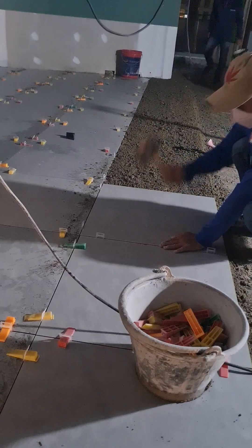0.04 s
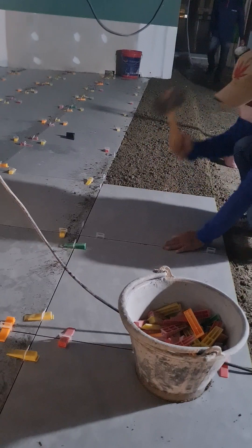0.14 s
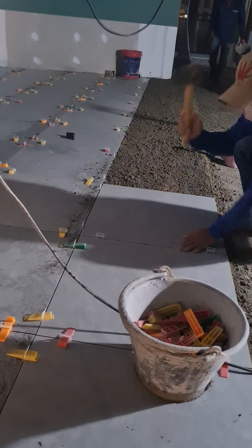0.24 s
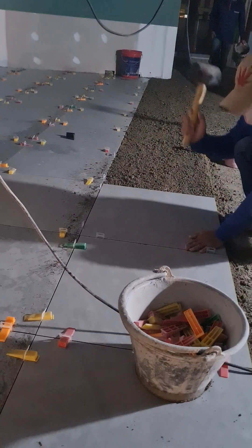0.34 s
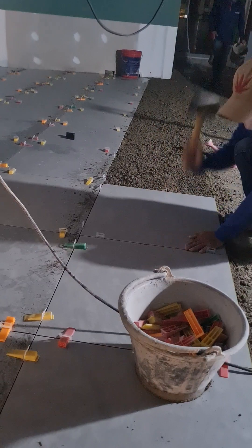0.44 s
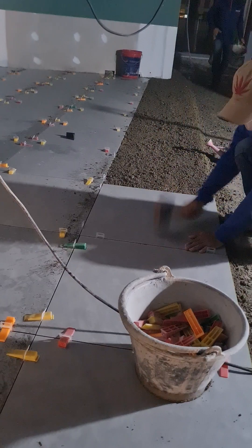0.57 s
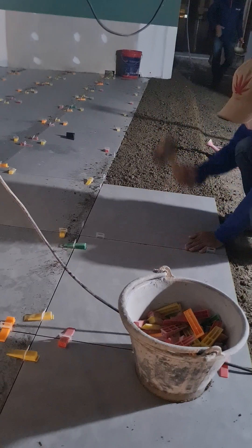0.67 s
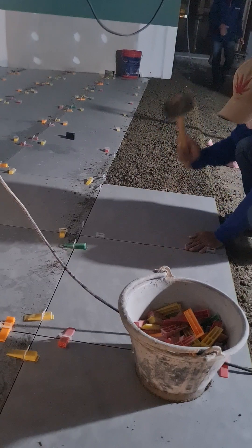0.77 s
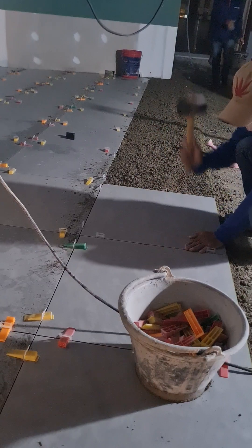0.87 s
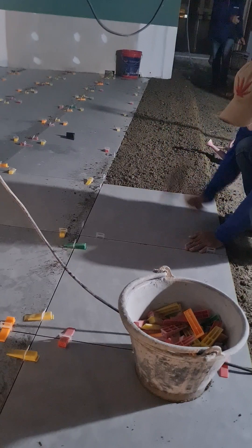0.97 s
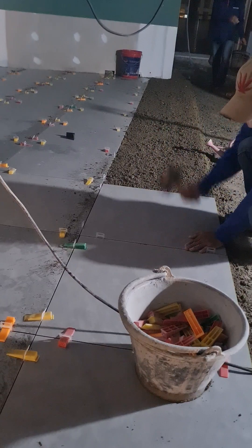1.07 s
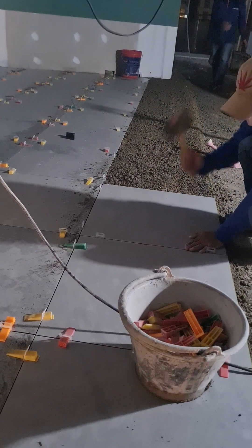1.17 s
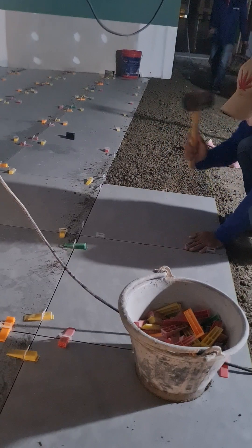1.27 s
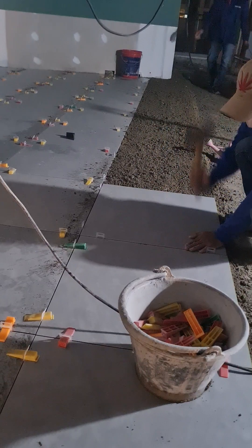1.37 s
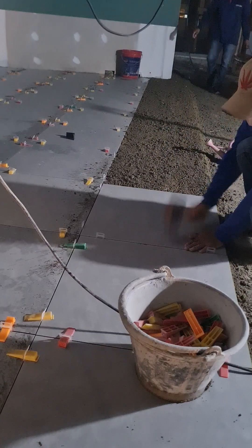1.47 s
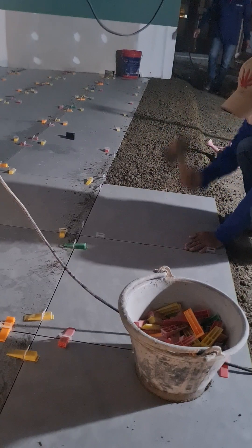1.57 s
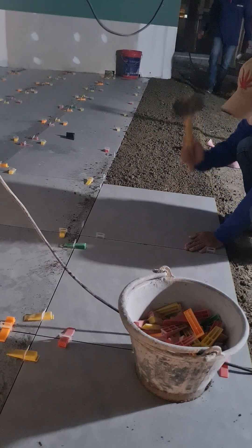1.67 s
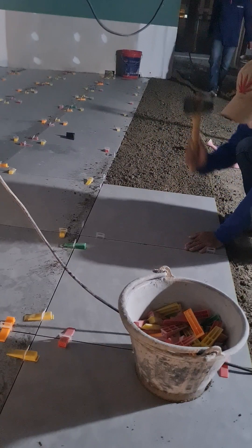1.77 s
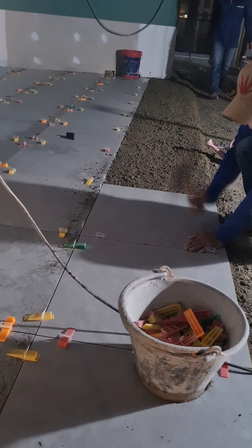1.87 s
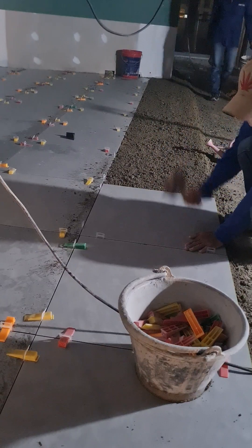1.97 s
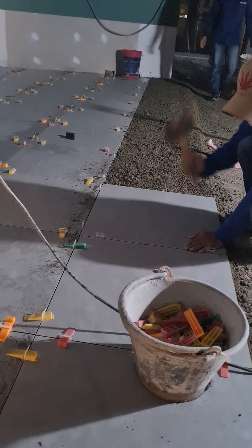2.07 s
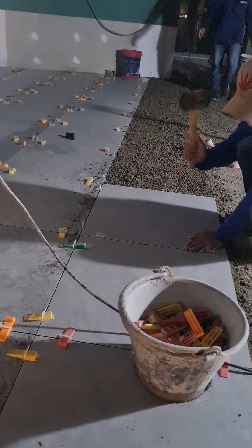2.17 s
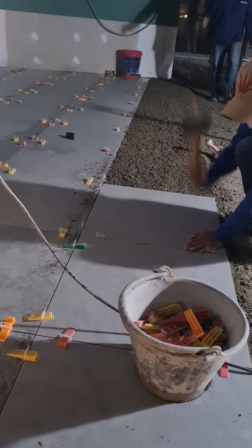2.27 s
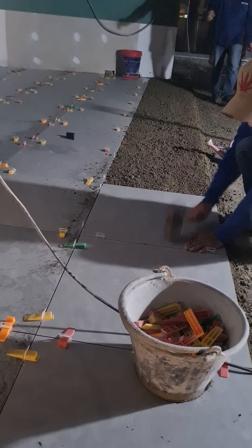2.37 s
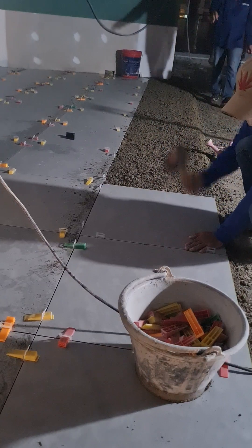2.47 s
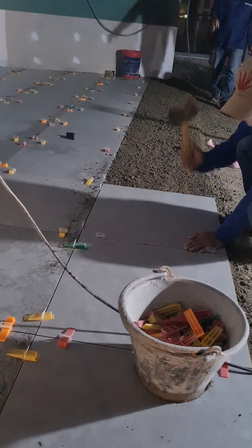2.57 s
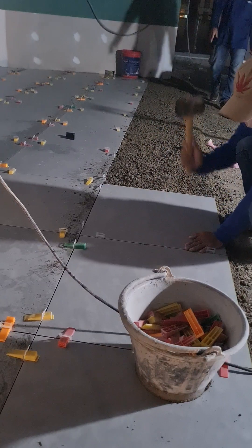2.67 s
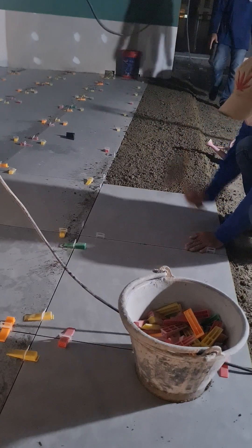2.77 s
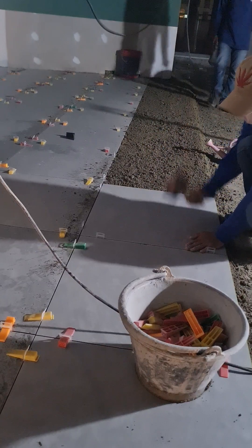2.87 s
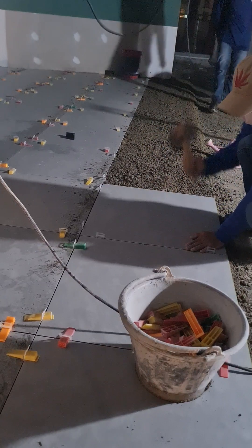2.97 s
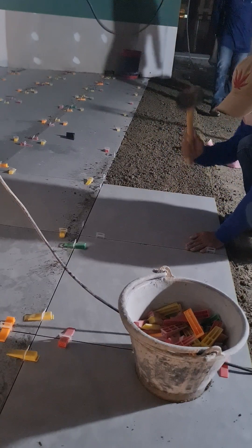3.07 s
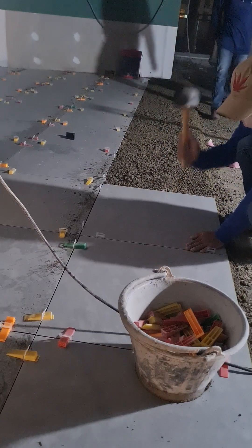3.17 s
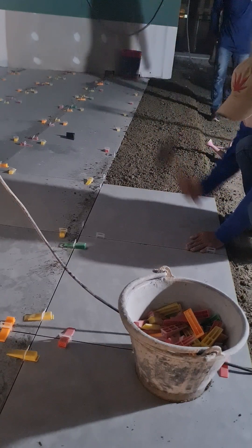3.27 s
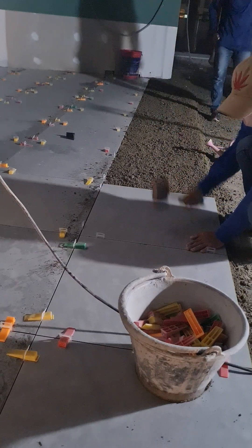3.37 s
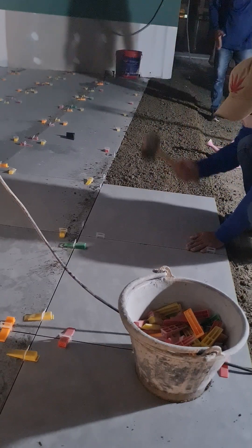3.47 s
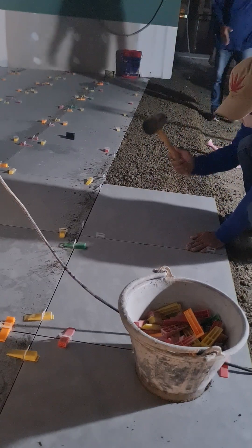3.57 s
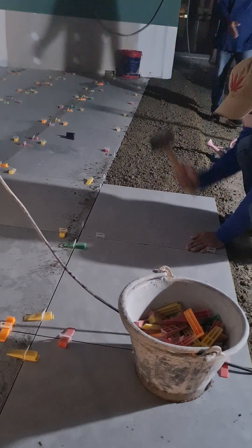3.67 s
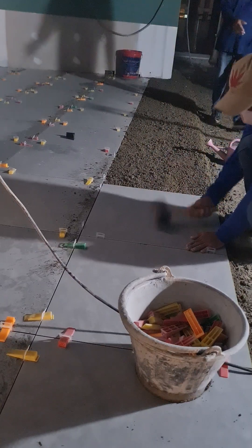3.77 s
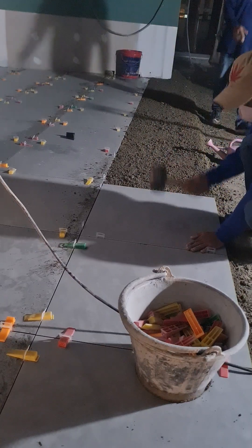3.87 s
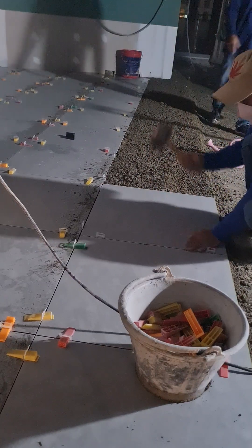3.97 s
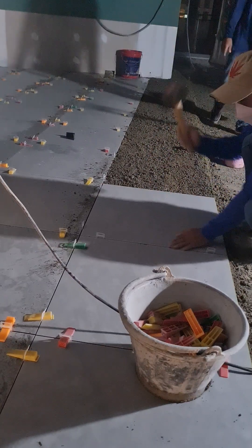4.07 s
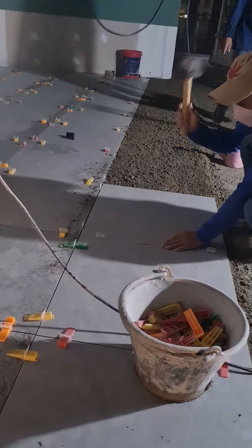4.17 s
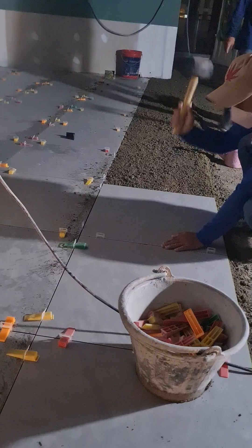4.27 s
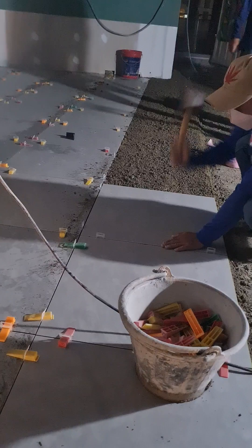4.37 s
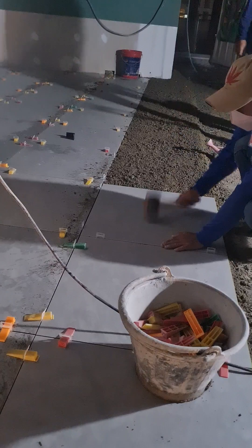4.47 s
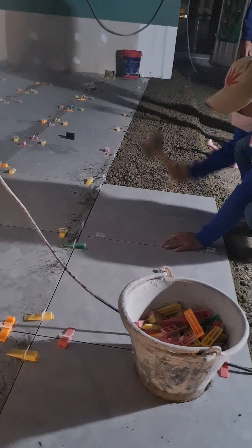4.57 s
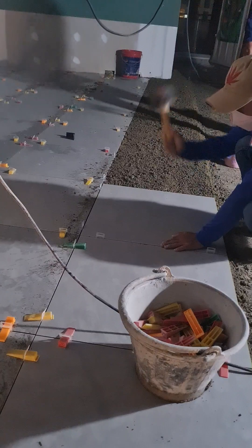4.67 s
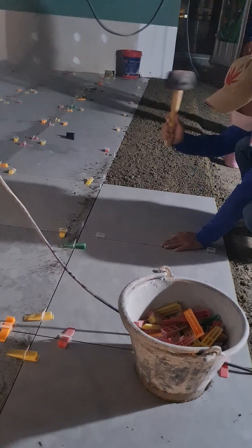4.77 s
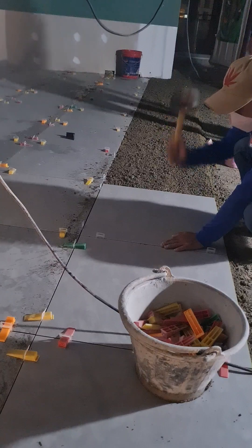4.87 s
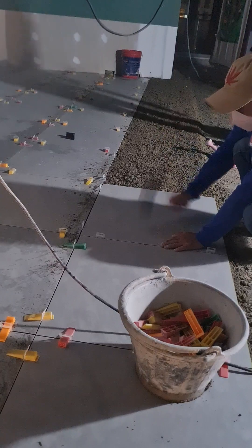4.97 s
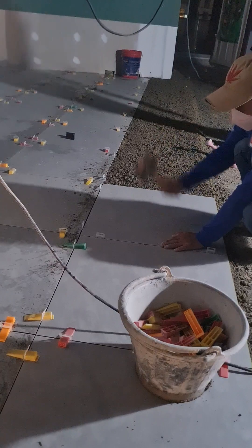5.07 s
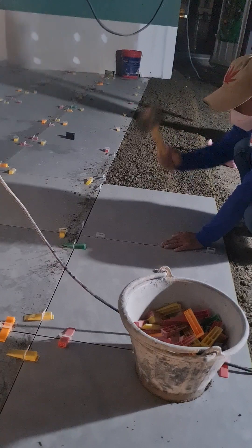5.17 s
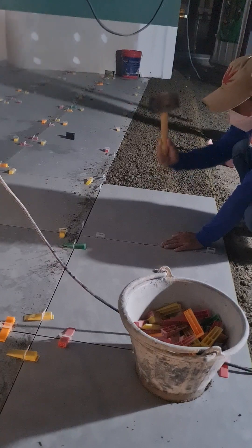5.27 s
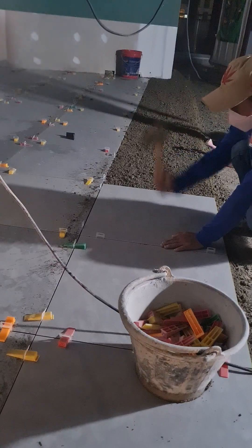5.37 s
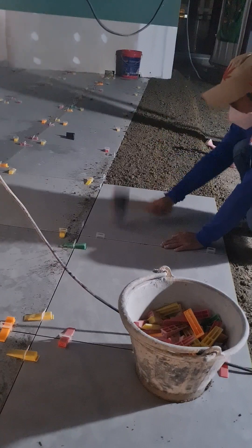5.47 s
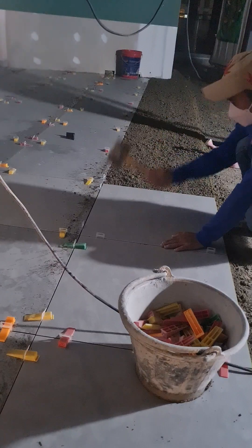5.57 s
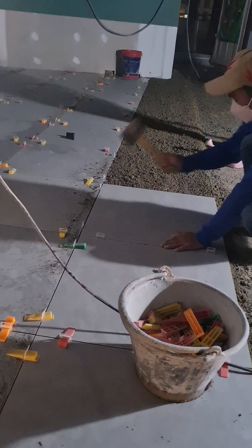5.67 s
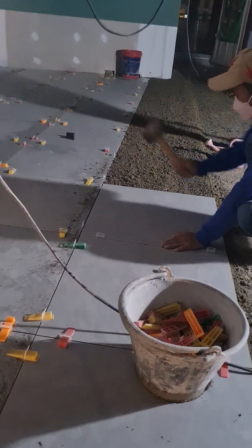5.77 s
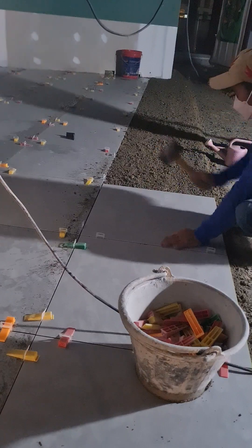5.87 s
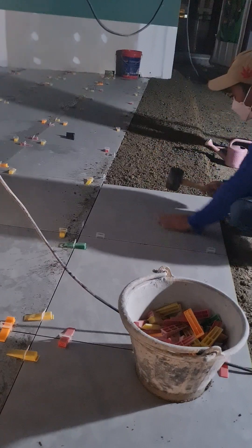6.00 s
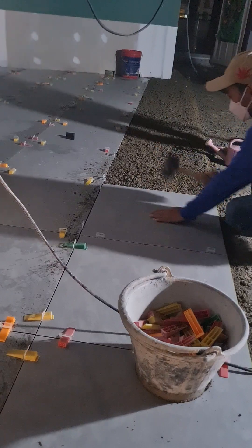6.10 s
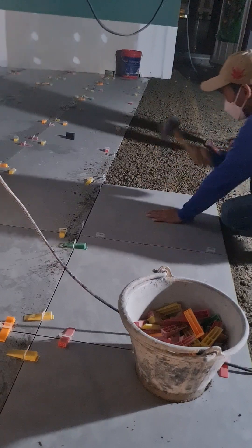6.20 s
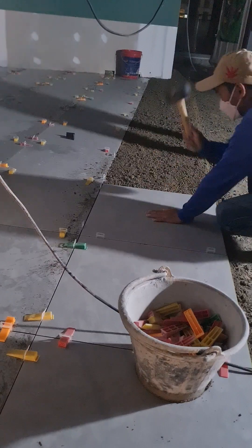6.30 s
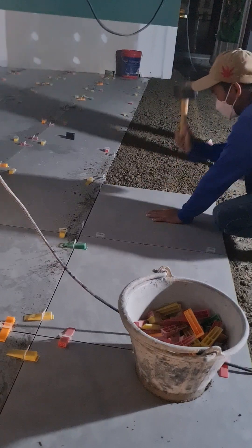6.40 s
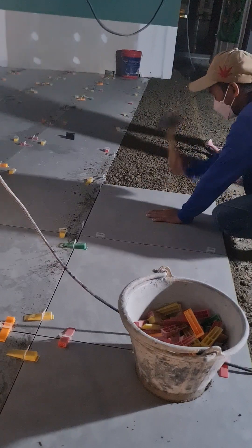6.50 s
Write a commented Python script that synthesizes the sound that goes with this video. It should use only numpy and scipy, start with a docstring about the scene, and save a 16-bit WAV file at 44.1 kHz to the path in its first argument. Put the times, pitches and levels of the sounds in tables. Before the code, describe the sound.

Steady mallet knocks on a heavy tile in an empty, reverberant building site. The first blows slap crisply; midway they turn duller and softer, then after a slightly longer gap the knocks return firm, the last one with a lingering low rattle. Faint grit scuffing, small ticks and quiet low rumble fill the gaps. Wide stereo, near and slightly overloaded on the blows.

```python
"""Bare, echoing hall: a rubber mallet beats a large floor tile into its mortar bed.
Each blow is a soft push that rings the bedded tile plus a short slap of rubber on glaze, made of shaped noise.
The hall answers with wall echoes, booming low modes and a tail of decaying noise.
Loose things tick and rattle; shaken grit, scuffing feet and a low site rumble are filtered noise."""
import sys
import numpy as np
from scipy import signal
from scipy.fft import rfft, irfft
from scipy.io import wavfile
from scipy.ndimage import uniform_filter1d

SR = 44100
rng = np.random.default_rng(int(sys.argv[2]) if len(sys.argv) > 2 else 0)


def amp(db):
    return 10 ** (np.asarray(db, float) / 20)


def write(x):
    x = np.atleast_2d(x).T
    wavfile.write(sys.argv[1], SR, np.round(np.clip(x, -1, 1) * 32767).astype(np.int16))


N = 288414
LEAD = SR // 10  # samples computed ahead of time 0, so that an earlier blow still rings
WINDOW, HOP = 512, 128  # samples, for noise shaped in time and frequency
FRAMES = N // HOP + 5

# push of the mallet head: (time of peak [s], level [dB], contact [ms], wake of tile mode 1 [dB], of mode 2 [dB])
BLOW_PUSHES = [(-.038, -5.5, 3.13, 0.5, 13.5), (.598, -5.5, 2.9, 0.5, 1), (1.0459, -3, 2.98, -0.5, 2),
               (1.4936, -4, 3.15, -1.5, 5), (1.9518, -2.5, 3.15, -3, 3.5), (2.4052, -2.5, 3.28, -4, 6),
               (2.8559, -2.5, 4.02, -6, 12), (3.3696, -3.5, 4.1, -21, -10), (3.8077, -8, 5.94, -4, -9),
               (4.5142, -6, 3.63, 9.5, -2), (5.0365, -4, 4, 2.5, 12), (5.4888, -3, 5.04, -5, -16),
               (5.495, -9.5, 2.9, 1.5, -19)]
# slap of rubber on glaze, one row a blow:
# (level [dB], brightness [dB/octave], share that fills the hall [dB], left over right trim [dB])
BLOW_SLAPS = [(-16.5, 4, 5.5, -13), (-14, 3, 0, -2), (-11.5, 2, -4, 2), (-8, 3, -3, 1.5),
              (-9.5, 1.5, -3, -4), (-11.5, 2, -0.5, -1), (-17, 2, 2, 0), (-24.5, 0, -24, -5),
              (-36, 4, -6, 6), (-12, 0, -3, -0.5), (-15.5, -0.5, -6.5, 5), (-37, 0, -10, 5),
              (-11, 2.5, -1, 0.5)]
# modes of the bedded tile: (frequency [Hz], relative level [dB], t60 [s])
TILE_MODES = [(161.5, -6.5, 0.057), (445, -12, 0.029), (119, -11.5, 0.029), (218, -36, 0.044),
              (307, -24, 0.14), (877, 12, 0.014), (1180, -10, 0.031), (1579, -8, 0.019)]
# slap spectrum: (frequency [Hz], relative density [dB per Hz])
SLAP_SPECTRUM = [(410, -85), (700, -5.5), (2520, -17), (3610, -21.5), (4170, -18.5), (5730, -26),
                 (6630, -20), (7370, -25), (8630, -27.5), (14300, -29), (16500, -49)]
# loose things ticking, knocking, rattling: (time [s], mode level [dB], frequency [Hz], t60 [s], roughness [ratio])
LOOSE_TICKS = [(1.5111, -28.5, 2076, 0.7, 0.8), (1.6103, -23, 2600, .004, 0), (1.6493, -20, 3300, .003, 0),
               (1.98, -38.5, 2060, 0.44, 1.13), (2.732, -36, 1874, 0.12, 0.77),
               (4.363, -38, 420, 0.031, 0.1), (5.496, -19.5, 287, .9, 0.45), (6.101, -36, 436, .04, 0.42),
               (6.525, -34.5, 633, 0.052, .2), (6.526, -37.5, 1350, 0.063, 0.4)]
# nearby things and single walls: (delay [s], thud level [dB], slap level [dB])
WALL_ECHOES = [(.0024, -13, -26), (.0145, -14, -7), (.019, -17, -30), (.0292, -16, -7), (0.043, -17, -33),
               (.059, -18.5, -12)]
# hall tail decay: (frequency [Hz], t60 [s])
HALL_T60 = [(60, 1.58), (160, 0.91), (420, 0.91), (1100, 0.72), (2900, 0.78), (7700, 0.7), (15000, 0.34)]
# hall tail spectrum: (frequency [Hz], relative level [dB])
HALL_SPECTRUM = [(50, -1), (160, 2.5), (420, -3.5), (900, 1.5), (2000, 2.5), (5000, 6.5), (9000, 5),
                 (15000, 7.5)]
# standing hall modes: (frequency [Hz], relative level [dB], t60 [s])
HALL_MODES = [(101.46, -23, 1.93), (135.5, -6.5, 0.49), (162.2, -15.5, 0.73), (221.7, -15, 0.89),
              (342, -11, 0.64), (454, -34, 2.15)]
# likeness of the channels in diffuse sound: (frequency [Hz], correlation [-1 to 1])
CHANNEL_LIKENESS = [(60, 0.96), (180, 0.94), (550, 0.42), (1650, -0.34), (4970, 0.24), (15000, -0.46)]
# left microphone over right: (frequency [Hz], level [dB])
LEFT_OVER_RIGHT = [(60, -1), (180, 1.5), (550, 1.5), (1650, 2.0), (4970, 4.5), (15000, 1)]
# shoes and knees dragged over grit:
# (time of full strength [s], held [s], relative level [dB], brightness [dB/octave])
DRAGS = [(.66, 0.043, -41, -3), (.77, 0.027, -50, -6), (.96, 0.14, -44, 1.5), (1.24, .22, -48, -1.5),
         (1.66, 0.026, -53, 14), (1.81, 0.15, -51, -2), (2.0, 0.051, -43, 6.5), (2.12, 0.023, -46, -5.5),
         (2.73, 0.076, -45, -0.5), (3.14, 0.02, -47.5, 1.2), (3.27, 0.086, -48, -1.5),
         (3.77, 0.097, -48.5, -1), (3.92, 0.058, -44.5, 2.2), (4.2, .03, -51.5, 1),
         (4.33, .04, -47.5, -1.5), (4.72, 0.045, -51, 2), (4.87, 0.21, -47.5, 0.1), (5.7, 0.1, -52.5, -5),
         (5.88, 0.2, -46, 1), (6.1, 0.027, -42, 0.5), (6.52, .05, -51.5, 0.5)]
# grit spectrum: (frequency [Hz], relative density [dB per Hz])
GRIT_SPECTRUM = [(240, -32), (400, 22.5), (432, -7.5), (590, 3.5), (700, -4.5), (986, -1), (1230, 0.5),
                 (1900, 1.5), (15300, -18), (16500, -23)]
# rumble spectrum: (frequency [Hz], relative density [dB per Hz])
RUMBLE_SPECTRUM = [(15, -46), (25, 13), (185, 17), (277, -27), (641, -5.5), (818, -2.5), (4250, -11),
                   (8140, -28), (9840, -115.5), (14800, -41), (16000, -24)]

LATE_PER_MS = 0.33  # the longer the contact, the later the force peaks
DEEP_DB_PER_MS, USUAL_CONTACT_MS = 4, 3.55  # longer contact wakes the third, deepest tile mode more
TOUCH_SHARE = .57  # first touch leads the peak by this share of the contact time
SCUFF_RISE_DB_PER_S, SCUFF_FALL_DB_PER_S = 189, 73
# each slap shakes the grit, which then settles
SHAKE_DB, SHAKE_TILT_DB_PER_OCTAVE, SHAKE_FALL_DB_PER_S = -26.5, -3.3, 36
PATCH_DB, CLUMP_DB = 1.3, 1.5  # rms level swing: over time and frequency, over time alone
RUMBLE_DB = -48.5


def evened(x):
    """Scales to rms 1."""
    return x / np.sqrt(np.mean(x ** 2) + 1e-20)


def read(points, hz):
    """Interpolates a table on a log-frequency axis."""
    f, value = np.transpose(points)
    return np.interp(np.log(hz + 1), np.log(f + 1), value)


def add(mix, time_s, sound):
    """Mixes a sound in at time_s."""
    part = mix[..., LEAD + round(time_s * SR):][..., :sound.shape[-1]]
    part += sound[..., :part.shape[-1]]


def ring(hz, db, t60_s, size=SR // 2, wave=np.sin):
    """One mode: a sinusoid under exponential decay."""
    t = np.arange(size) / SR
    return amp(db - 60 * t / max(t60_s, .002)) * wave(2 * np.pi * hz * t)


def diffuse(level_db, count):
    """Two-channel noise shaped by level_db(hz, t); the bass is alike in both channels."""
    hz = np.fft.rfftfreq(WINDOW, 1 / SR)[:, None]
    t = np.arange(count // HOP + 5) * HOP / SR
    a, b, c, d = rng.standard_normal((len(t), len(hz), 4)).T
    same = np.clip(read(CHANNEL_LIKENESS, hz), -1, 1)
    left = a + 1j * b
    right = same * left + np.sqrt(1 - same ** 2) * (c + 1j * d)
    shaped = np.array([left, right]) * amp(level_db(hz, t))
    return signal.istft(shaped, nperseg=WINDOW, noverlap=WINDOW - HOP)[1][:, :count]


def thud(db, contact_ms, *spot_db):
    """The tile is shoved down and stopped (dip, peak, dip of pressure), then springs back in its modes."""
    late = np.clip(LATE_PER_MS * contact_ms, .75, 2)  # rubber stiffens as it squashes
    u = np.linspace(0, 1, round(contact_ms * SR / 1000)) ** late
    push = np.sin(np.pi * u) ** 4
    speed = np.diff(push, prepend=0)
    acceleration = np.diff(push, 2, prepend=[0, 0])
    deep_db = DEEP_DB_PER_MS * (contact_ms - USUAL_CONTACT_MS)
    wake_db = [*spot_db, deep_db] + [0] * len(TILE_MODES)
    modes = sum(ring(hz, mode_db + wake, t60_s, size=SR // 8, wave=np.cos)
                for (hz, mode_db, t60_s), wake in zip(TILE_MODES, wake_db))
    sound = np.convolve(push / push.sum(), modes)
    sound[:len(push)] += .6 * acceleration / acceleration.min() - .6 * speed / speed.max()
    return amp(db) * sound


def slap(db, tilt_db, hall_db, pan_db, noise):
    """A few ms of hiss plus stiff tile modes; the hall, averaging directions, gets an evenly coloured click."""
    size = noise.shape[1]
    t, hz = np.arange(size) / SR, np.fft.rfftfreq(size, 1 / SR)
    pair = np.array([noise[0], 0.58 * noise[0] + 1.09 * noise[1]])
    pair *= amp([[pan_db / 2], [-pan_db / 2]])
    colour = amp(read(SLAP_SPECTRUM, hz) + tilt_db * np.log2(hz / 3000 + 0.0075))
    burst = (1 - np.exp(-t / .0001)) * np.exp(-(t / .0018) ** 2)
    shape = amp(db) * (burst + amp(-23.5 - 60 * t / 0.28))  # burst over a faint, slower decay
    # only the slap is sharp enough to wake the modes above 1 kHz
    stiff = -sum(ring(f, db + mode_db, t60_s, size=size) for f, mode_db, t60_s in TILE_MODES if f > 1000)
    click = np.roll(irfft(colour), 200)[:400]
    click *= amp(hall_db) * np.linalg.norm(shape) / np.linalg.norm(click)
    click = np.pad(click, (0, size - len(click))) + amp(hall_db) * stiff
    hiss = evened(irfft(rfft(pair) * colour)) * shape
    return hiss + stiff, click


def tick(db, hz, t60_s, rough, noise):
    """A small mode with two brief overtones; loose contact makes it flutter."""
    flutter = evened(uniform_filter1d(noise, size=round(8 * SR / hz)))
    sound = ring(hz, db, t60_s) + ring(1.9 * hz, db - 6, .004) + ring(3.6 * hz, db - 9, .003)
    return sound * (1 - rough + rough * flutter)


def hall(x):
    """Standing low modes and a dense tail that builds up late; the tail changes as the mallet moves on."""
    size = SR * 3 // 2
    build = np.clip((np.arange(size) / SR - .006) / 0.0052, 0, 1)
    booms = sum(ring(hz, db, t60_s, size=size) for hz, db, t60_s in HALL_MODES) / np.sqrt(size)
    out = signal.fftconvolve(x, booms * build)[None]
    place = .45 * np.arange(len(x)) / SR  # radians, turning from one tail to another
    for share in np.cos(place), np.sin(place):
        tail = diffuse(lambda hz, t: read(HALL_SPECTRUM, hz) - 60 * t / read(HALL_T60, hz), count=size)
        tail *= amp(1.0) / np.linalg.norm(tail[0])
        out = out + signal.fftconvolve((share * x)[None], tail * build, axes=1)
    return out[:, :len(x)]


def stirring(t):
    """Level [dB] and brightness [dB/octave] of moving grit at times t: scuffs swell and fade, slaps shake it."""
    full_s, held_s, db, tilt = np.transpose(DRAGS)[:, :, None]
    rise_db = SCUFF_RISE_DB_PER_S * np.maximum(full_s - t, 0)
    fall_db = SCUFF_FALL_DB_PER_S * np.maximum(t - full_s - held_s, 0)
    dragged_db = db - rise_db - fall_db
    hit_s = np.transpose(BLOW_PUSHES)[0, :, None]
    slap_db, slap_tilt, hall_db, _ = np.transpose(BLOW_SLAPS)[:, :, None]
    settling_db = slap_db + hall_db + SHAKE_DB - SHAKE_FALL_DB_PER_S * (t - hit_s)
    shaken_db = np.where(t > hit_s, settling_db, -np.inf)
    power = amp(np.vstack([dragged_db, shaken_db])) ** 2
    tilts = np.vstack([tilt, SHAKE_TILT_DB_PER_OCTAVE + slap_tilt])
    return 10 * np.log10(power.sum(0)), (power * tilts).sum(0) / power.sum(0)


def scuffs():
    """Patchy, clumpy gritty hiss of people moving about and of grit shaken by the blows."""
    patches = rng.standard_normal((FRAMES, WINDOW // 2 + 1)).T
    patches = uniform_filter1d(patches, size=24, axis=0)
    patches = evened(uniform_filter1d(patches, size=10, axis=1))
    clumps = evened(uniform_filter1d(rng.standard_normal(FRAMES), size=3))
    band_hz = np.arange(1500, 9000, SR / WINDOW)
    scale_db = -10 * np.log10(np.sum(amp(read(GRIT_SPECTRUM, band_hz)) ** 2) * 2 / 3)  # evens the band power
    moving_db, tilt = stirring(np.arange(FRAMES) * HOP / SR)
    frame_db = scale_db + PATCH_DB * patches + CLUMP_DB * clumps + moving_db
    return diffuse(lambda hz, t: read(GRIT_SPECTRUM, hz) + frame_db + tilt * np.log2(hz / 3000 + 0.009), count=N)


def rumble():
    """The steady low noise of the site."""
    return amp(RUMBLE_DB) * evened(diffuse(lambda hz, t: read(RUMBLE_SPECTRUM, hz) + 0 * t, count=N))


def scene():
    """Blows and ticks, direct and through the hall, blows also off single walls, over the background."""
    near, sent = np.zeros((2, N + LEAD)), np.zeros(N + LEAD)  # sent feeds the hall
    treble = signal.butter(2, 2800 / (SR / 2), "high")
    slap_noises = rng.standard_normal((len(BLOW_SLAPS), 2, 2048))
    for (peak_s, *push), touch, noise in zip(BLOW_PUSHES, BLOW_SLAPS, slap_noises):
        sound = thud(*push)
        hiss, click = slap(*touch, noise)
        start_s = peak_s - sound.argmax() / SR
        touch_s = peak_s - TOUCH_SHARE * push[1] / 1000
        add(near, start_s, sound)
        add(sent, start_s, sound)
        add(near, touch_s, hiss)
        add(sent, touch_s, click)
        glint = amp(touch[2]) * signal.lfilter(*treble, hiss)  # only the slap's treble comes back sharp
        for delay_s, thud_db, slap_db in WALL_ECHOES:
            add(near, start_s + delay_s, amp(thud_db) * sound)
            add(near, touch_s + delay_s, amp(slap_db) * glint)
    tick_noises = rng.standard_normal((len(LOOSE_TICKS), SR // 2))
    for (time_s, *row), noise in zip(LOOSE_TICKS, tick_noises):
        sound = tick(*row, noise)
        add(near, time_s, sound)
        add(sent, time_s, amp(-5.5) * sound)
    return (near + hall(sent))[:, LEAD:] + scuffs() + rumble()


def top_cut(x):
    """Nothing passes above the cut-off."""
    return signal.sosfilt(signal.butter(12, 17160, fs=SR, output="sos"), x)


def record(dry):
    """Unequal microphones with a bass cut, and a soft overload on the blows."""
    half_db = read(LEFT_OVER_RIGHT, np.fft.rfftfreq(N, 1 / SR)) / 2
    heard = irfft(rfft(dry) * amp([half_db, -half_db]), N)
    heard = signal.lfilter(*signal.butter(4, 56 / (SR / 2), "high"), heard)
    heard = 1.2 * np.tanh(heard / 1.2)
    return top_cut(heard)


dry = scene()
out = record(dry)
write(out)
```